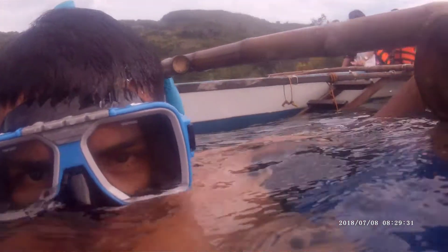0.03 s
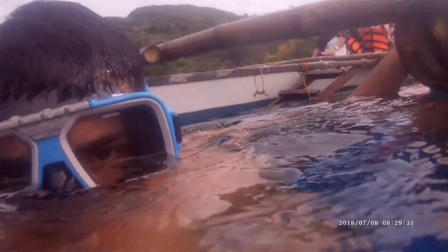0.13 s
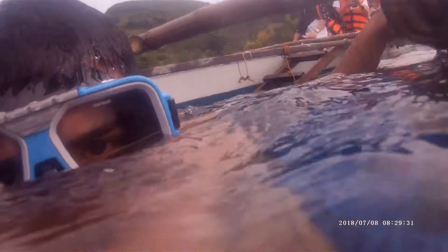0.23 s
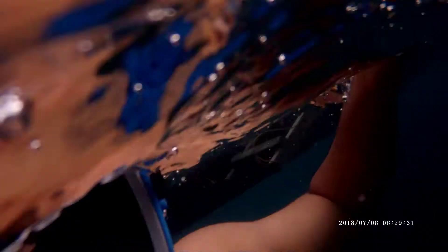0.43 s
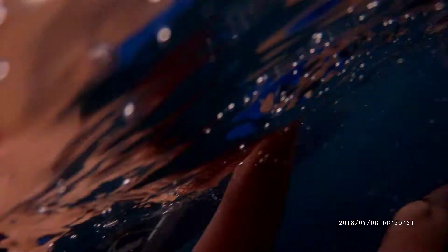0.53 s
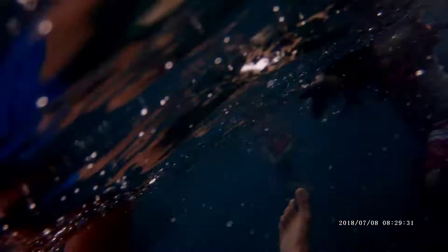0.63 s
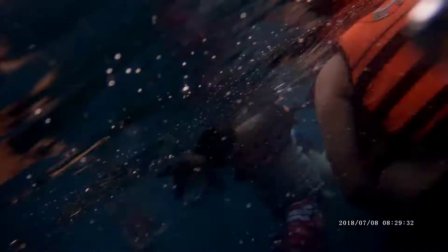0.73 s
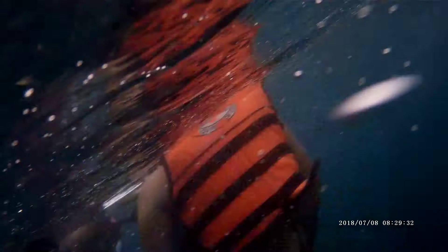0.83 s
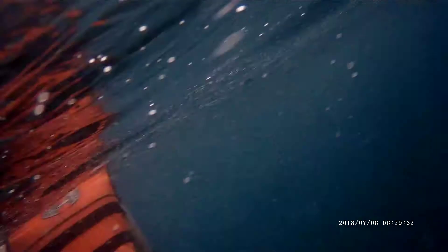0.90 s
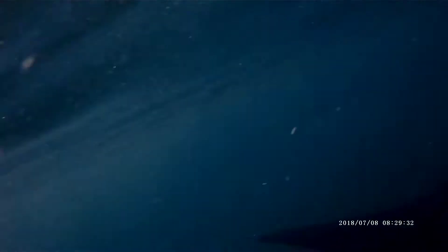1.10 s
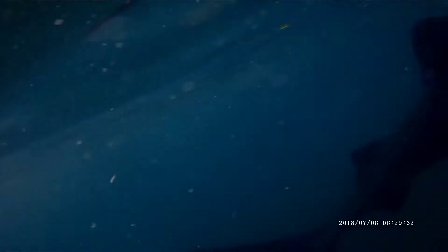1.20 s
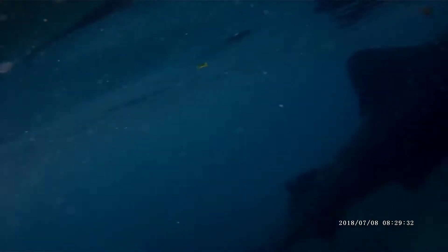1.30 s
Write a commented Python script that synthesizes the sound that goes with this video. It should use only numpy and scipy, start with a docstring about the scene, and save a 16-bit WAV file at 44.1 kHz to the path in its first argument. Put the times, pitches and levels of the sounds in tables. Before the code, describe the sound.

Water closes over a camera with one loud plop that overloads the microphone. Small bubbles pop and fizz against its waterproof case, with two dull bumps and faint swishes over a muffled wash of sea water.

```python
"""In the sea, a camera in a waterproof case dips under. Water closes over it with one loud plop,
a collapsing cavity that overloads the microphone. Air pockets and small bubbles pop and fizz
against the case, which rings briefly near 1.6 kHz; water films snap and free bubbles ring on.
Two dull bumps hit the case, and water swishes along it over a muffled wash."""
import sys
import numpy as np
from scipy import signal
from scipy.fft import rfft, irfft, next_fast_len
from scipy.io import wavfile
from scipy.ndimage import map_coordinates

SR = 44100
rng = np.random.default_rng(int(sys.argv[2]) if len(sys.argv) > 2 else 0)


def wav_out(sig):
    """Save sig, one row per channel (or a flat mono array), as 16-bit PCM at SR to the path in sys.argv[1]."""
    wavfile.write(sys.argv[1], SR, np.round(np.clip(np.atleast_2d(sig).T, -1, 1) * 32767).astype(np.int16))


N = 59535
T = np.arange(int(0.05 * SR)) / SR  # time axis of one short event
PLOP_S = 0.2172
BUBBLE_SWELL_S, TICK_SWELL_S = 0.00094, 0.00071

# snap spectrum: freq_hz, gain_db
SNAP_COLOUR = [(900, -38), (3500, 3.5), (5200, -11), (10600, -33.5), (12600, -52)]
# case resonance: freq_hz, gain_db
CASE_COLOUR = [(200, -44), (980, -18), (1400, 4), (1750, 5), (2400, -3.5), (3500, -9.5), (4400, -14.5),
               (7000, -40)]


def amp(db):
    return 10 ** (np.asarray(db) / 20)


def gains(colour, size):
    """Gain on an FFT grid from freq_hz, gain_db points."""
    hz, db = np.transpose(colour)
    grid_hz = np.fft.rfftfreq(size, 1 / SR)
    return amp(np.interp(np.log(grid_hz + 1), np.log(hz + 1), db))


def noise(colour, size):
    """Coloured noise, rms 1."""
    x = irfft(rfft(rng.standard_normal(size)) * gains(colour, size), size)
    return x / np.sqrt(np.mean(x ** 2) + 1e-20)


def impulse(colour, size=2048):
    """Minimum-phase coloured click, peak 1."""
    cepstrum = irfft(np.log(gains(colour, size)))
    cepstrum[1:size // 2] *= 2
    cepstrum[size // 2 + 1:] = 0
    click = irfft(np.exp(rfft(cepstrum)))
    return click / np.abs(click).max()


def wobble(rate_hz, size):
    """Smooth random curve with knots at rate_hz."""
    knots = rng.standard_normal(size // 4)
    return map_coordinates(knots, [np.arange(size) * rate_hz / SR], mode="wrap")


def add(track, start_s, sound):
    part = track[max(round(start_s * SR), 0):][:len(sound)]
    part += sound[:len(part)]


def swell(peak_s):
    """Envelope: rises to 1 at peak_s, then decays."""
    return T / peak_s * np.exp(1 - T / peak_s)


def burst(click, swell_s):
    """Brief spatter of clicks, rms about 1 at its height."""
    spatter = swell(swell_s) * rng.standard_normal(len(T))
    sound = signal.fftconvolve(spatter, click)[:len(T)]
    return sound * np.linalg.norm(swell(swell_s)) / np.linalg.norm(sound)


def bubble(pitch_hz, swell_s, sag=0.06, rough_rad=0.86):
    """Trapped air rings for a few uneven cycles; pitch sags as it settles."""
    glide_hz = pitch_hz * (1 + sag * (2 * np.exp(-T / (2 * swell_s)) - 1))
    phase = 2 * np.pi * np.cumsum(glide_hz) / SR + rough_rad * wobble(858, len(T))
    onset = 1 - np.exp(-2 * pitch_hz * T)
    return swell(swell_s) * onset * np.sin(phase)


def plop(start_hz=1778, end_hz=1260, glide_s=0.002, swell_s=0.0021, gain_db=3.5, snap_db=-38):
    """One large cavity closes with a snap; pitch falls as it settles."""
    out = np.zeros(N)
    pitch_hz = end_hz + (start_hz - end_hz) * np.exp(-T / glide_s)
    ring = swell(swell_s) ** 2 * np.sin(2 * np.pi * np.cumsum(pitch_hz) / SR)
    snap = amp(snap_db) * burst(impulse(SNAP_COLOUR), BUBBLE_SWELL_S)
    add(out, PLOP_S, ring + snap)
    return amp(gain_db) * out


def pops(pocket_gain_db=0.5, splash_gain_db=-16.5, small_gain_db=-2):
    """Each burst on the case rings an air pocket and a smaller bubble, with a wet splash."""
    # air pockets: start_s, pitch_hz, level_db, swell_s, small_hz, small_db
    pockets = [(0.1206, 1520, -21.5, 0.00061, 3750, -36.5), (0.2437, 1615, -33, 0.0015, 3560, -34),
               (0.2613, 1670, -30.5, 0.001, 3400, -31), (0.276, 1635, -19, 0.0018, 2934, -16),
               (0.2805, 1712, -21.5, 0.0014, 3340, -45), (0.29, 1535, -21.5, 0.0013, 3510, -22.5),
               (0.318, 1500, -32, 0.00035, 3930, -26.5), (0.3213, 1698, -13.5, 0.00065, 2463, -13.5),
               (0.3306, 1626, -31, 0.0026, 3810, -18.5), (0.3508, 1773, -38.5, 0.0023, 3880, -29.5),
               (0.3697, 1510, -27.5, 0.00059, 2730, -22.5), (0.3806, 1580, -34, 0.00057, 2460, -25.5),
               (0.3886, 2090, -26, 0.00046, 4390, -24), (0.449, 1640, -17.5, 0.00042, 4280, -23.5),
               (0.4574, 1960, -18.5, 0.00057, 3520, -25), (0.489, 1738, -12.5, 0.0016, 3014, -12),
               (0.5072, 1594, -20, 0.00026, 2250, -30), (0.623, 1838, -20.5, 0.0017, 3000, -19),
               (0.6539, 1820, -23, 0.00053, 3240, -38), (0.6607, 1654, -4, 0.00066, 3860, -34),
               (0.7788, 1557, -9, 0.00052, 2920, -16), (0.9079, 2294, -38, 0.0014, 2594, -37.5),
               (0.9803, 1780, -31, 0.00082, 3800, -48), (0.9823, 1730, -33, 0.0024, 4054, -28.5)]
    out, click = np.zeros(N), impulse(CASE_COLOUR)
    for start_s, pitch_hz, level_db, swell_s, small_hz, small_db in pockets:
        pocket = amp(pocket_gain_db) * bubble(pitch_hz, swell_s)
        splash = amp(splash_gain_db) * burst(click, BUBBLE_SWELL_S)
        small = amp(small_db + small_gain_db) * bubble(small_hz, BUBBLE_SWELL_S)
        add(out, start_s, amp(level_db) * (pocket + splash) + small)
    return out


def case_ring(drive, t60_s=0.02, gain_db=4.5, tails=27):
    """The case rings after each pop, a little differently as the water shifts around it."""
    out, click = np.zeros(N), impulse(CASE_COLOUR)
    for centre in np.linspace(0, N, tails):
        crossfade = np.clip(1 - np.abs(np.arange(N) - centre) * (tails - 1) / N, 0, 1)
        decay = rng.standard_normal(len(T)) * amp(-60 * T / t60_s)
        tail = signal.fftconvolve(decay, click)
        tail /= np.abs(rfft(tail)).max()
        out += signal.fftconvolve(drive * crossfade, tail)[:N]
    return amp(gain_db) * out


def gloops(rise_per_s=0.83, rough_rad=0.6):
    """Larger free bubbles ring on, rising in pitch and wavering as the water shifts."""
    # free bubbles: start_s, pitch_hz, level_db, t60_s
    free_bubbles = [(0.219, 705, -23, 0.02), (0.2192, 929, -12.5, 0.015), (0.4263, 1366, -23, 0.022),
                    (.449, 1014, -40.5, 0.16), (0.456, 1770, -27, 0.13), (.508, 2140, -32.5, 0.03),
                    (.661, 720, -35.5, 0.061), (0.661, 992, -26.5, 0.038), (.779, 695, -45, 0.085),
                    (.779, 1050, -26, 0.027)]
    out, t = np.zeros(N), np.arange(SR // 5) / SR
    for start_s, pitch_hz, level_db, t60_s in free_bubbles:
        envelope = amp(level_db - 60 * t / t60_s) * (1 - np.exp(-t / BUBBLE_SWELL_S))
        phase = 2 * np.pi * pitch_hz * t * (1 + rise_per_s * t / 2)
        add(out, start_s, envelope * np.sin(phase + rough_rad * wobble(170, len(t))))
    return out


def snaps(gain_db=1.5, boost_db=14, width_oct=0.15):
    """Water films break with dry ticks, each with its own bright band."""
    # breaking films: start_s, bright_hz, level_db
    films = [(.1208, 4280, -45.5), (0.2422, 4360, -39.5), (0.2507, 7230, -40), (0.2801, 9330, -40.5),
             (0.3173, 7300, -40), (0.3297, 6340, -34), (0.3515, 7240, -34), (.37, 9900, -31.5),
             (0.3804, 5150, -34.5), (0.3884, 4870, -36.5), (.4565, 5540, -30.5), (0.4884, 4180, -29),
             (0.504, 10100, -48), (.623, 4430, -39), (0.6531, 4430, -36.5), (0.7715, 3970, -39),
             (0.7987, 3580, -49.5), (0.8253, 5320, -42), (.983, 7260, -32.5), (0.9898, 4200, -42.5)]
    out, grid_hz = np.zeros(N), np.geomspace(200, SR / 2, 120)
    colour_hz, colour_db = np.transpose(SNAP_COLOUR)
    base_db = np.interp(np.log(grid_hz), np.log(colour_hz), colour_db)
    for start_s, bright_hz, level_db in films:
        band_db = boost_db * np.exp(-0.5 * (np.log2(grid_hz / bright_hz) / width_oct) ** 2)
        click = impulse(np.column_stack([grid_hz, base_db + band_db]))
        add(out, start_s, amp(level_db + gain_db) * burst(click, TICK_SWELL_S))
    return out


def knocks(gain_db=-1):
    """Dull bumps on the case, with no ring of their own."""
    # bumps: start_s, level_db
    bumps = [(.6232, -26), (1.1696, -29)]
    # bump spectrum: freq_hz, gain_db
    colour = [(60, -37), (280, -7.5), (1500, 9.5), (3200, -11.5), (7000, -61)]
    out = np.zeros(N)
    for start_s, level_db in bumps:
        add(out, start_s, amp(level_db + gain_db) * impulse(colour))
    return out


def swishes(edge_s=0.0064, grain_db=1.5):
    """Water rubs along the case in short grainy rushes."""
    # rushes: start_s, length_s, first_db, last_db
    rushes = [(1.013, 0.019, -47, -48.5), (1.159, 0.042, -46.5, -52.5), (1.196, 0.0379, -45.5, -39)]
    # rubbing spectrum: freq_hz, gain_db
    colour = [(60, -33), (800, -4.5), (1550, 11.5), (1900, 8.5), (2500, -10.5), (3500, -4.5), (4500, -12),
              (5300, -24), (13000, -52)]
    out, t = np.zeros(N), np.arange(N) / SR
    for start_s, length_s, first_db, last_db in rushes:
        end_s = start_s + length_s
        gate = np.clip(np.minimum(t - start_s, end_s + edge_s - t) / edge_s, 0, 1)
        level_db = np.interp(t, [start_s, end_s], [first_db, last_db]) + grain_db * wobble(230, N)
        out += gate * amp(level_db) * noise(colour, N)
    return out


def fizz(rate_per_s=110, centre_hz=2870, base_db=-62.5, spread_db=0.5, surge_db=23, calm_s=0.11):
    """Tiny bubbles tick at random, loudest while the air dragged down by the plop breaks up."""
    out = np.zeros(N)
    for pitch_draw, level_draw in rng.standard_normal((int(rate_per_s * N / SR), 2)):
        start_s = rng.uniform(0, N / SR)
        surge = (start_s > PLOP_S) * np.exp(-((start_s - PLOP_S) / calm_s) ** 2)
        level_db = base_db + spread_db * level_draw + surge_db * surge
        pitch_hz = centre_hz * np.exp(0.17 * pitch_draw)
        add(out, start_s, amp(level_db) * bubble(pitch_hz, TICK_SWELL_S))
    return out


def wash(flicker_db=2.5, flicker_hz=69.92):
    """Moving water heard through the case."""
    # wash envelope: time_s, level_db
    envelope = [(0, -60.5), (0.169, -60.5), (0.198, -55.5), (0.359, -54), (.56, -58), (.85, -55.5),
                (0.949, -60.5), (1.03, -54.5), (1.14, -56), (1.35, -58)]
    # wash spectrum: freq_hz, gain_db
    colour = [(60, -32), (160, -21.5), (350, -13.5), (750, -14.5), (1100, -9.5), (1400, 1.5), (1750, -5.5),
              (2100, -12), (2500, -26), (3100, -17), (4400, -23.5), (5300, -33), (16000, -64.5)]
    level_db = np.interp(np.arange(N) / SR, *np.transpose(envelope))
    return amp(level_db + flicker_db * wobble(flicker_hz, N)) * noise(colour, N)


def scene(case_band_hz=(910, 5600), plop_drive_db=-8):
    """Plop and crackle ring the case; the other water sounds mix in directly. Mono."""
    case_filter = signal.butter(3, case_band_hz, "bandpass", fs=SR, output="sos")
    crackle = signal.sosfilt(case_filter, pops() + fizz())
    cavity = plop()
    ring = case_ring(crackle + amp(plop_drive_db) * cavity)
    return (cavity + crackle + ring + snaps() + gloops() + knocks() + wash() + swishes())[None]


def record(dry, ceiling=1.02, hardness=7, low_cut_hz=170, top_hz=16300):
    """The plop overloads the microphone; deep bass and top treble are cut."""
    clipped = dry / (1 + np.abs(dry / ceiling) ** hardness) ** (1 / hardness)
    size = next_fast_len(N + SR // 2)
    hz = np.fft.rfftfreq(size, 1 / SR)
    passband = (hz < top_hz) * hz / np.hypot(hz, low_cut_hz)
    return irfft(rfft(clipped, size) * passband, size)[:, :N]


dry = scene()
out = record(dry)
wav_out(out)
```